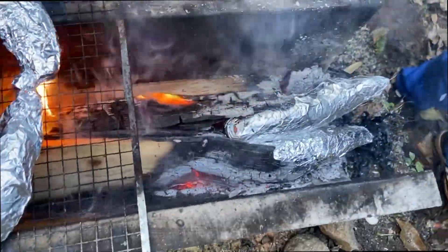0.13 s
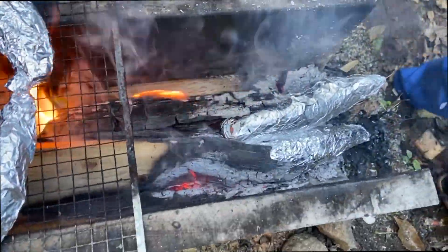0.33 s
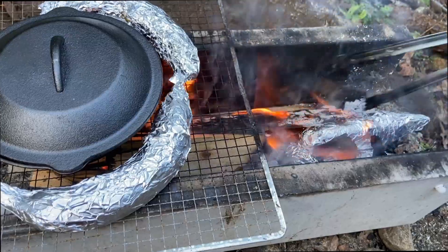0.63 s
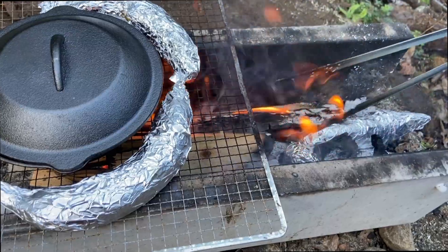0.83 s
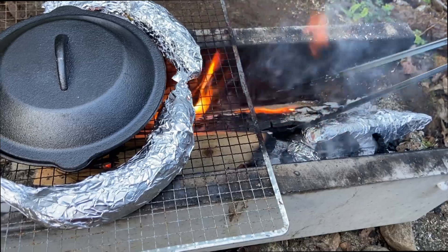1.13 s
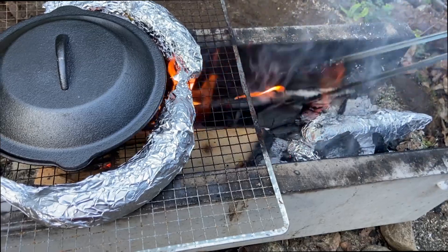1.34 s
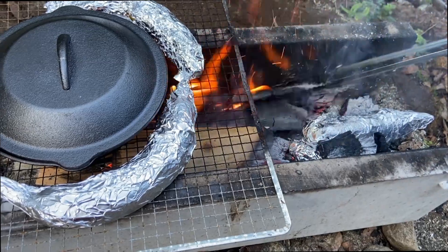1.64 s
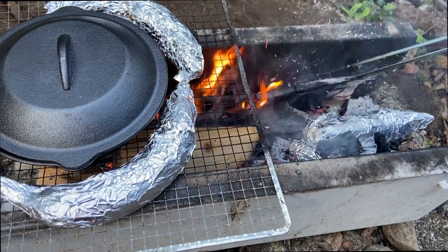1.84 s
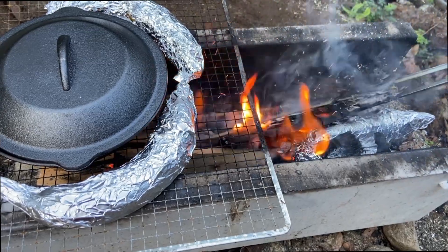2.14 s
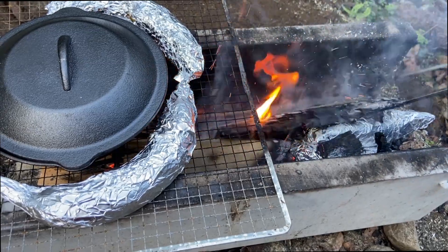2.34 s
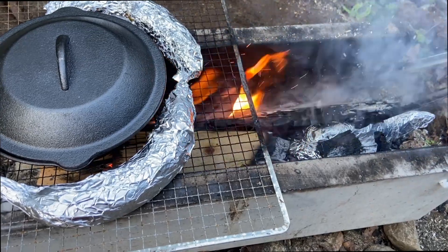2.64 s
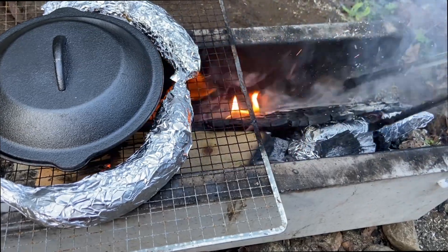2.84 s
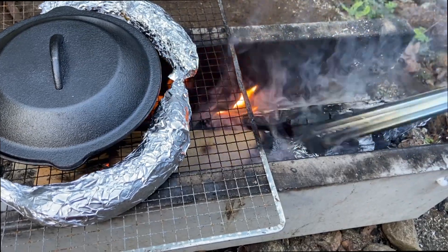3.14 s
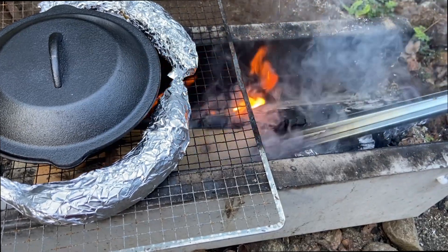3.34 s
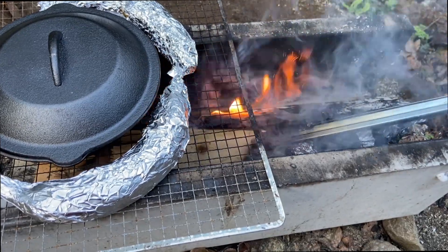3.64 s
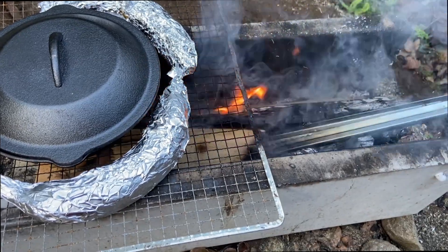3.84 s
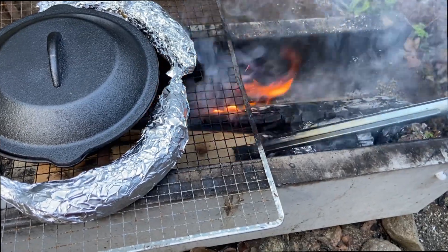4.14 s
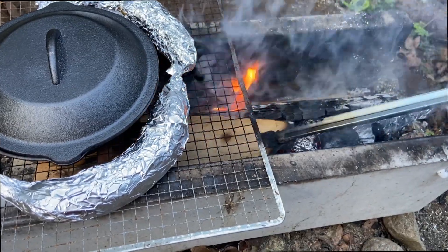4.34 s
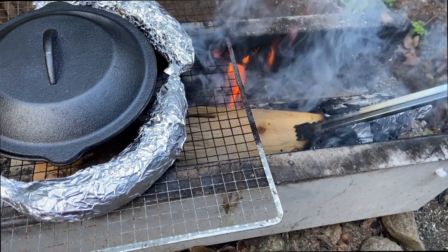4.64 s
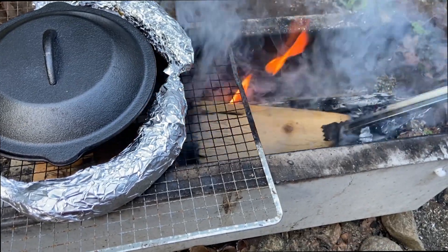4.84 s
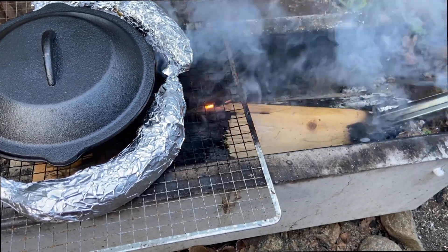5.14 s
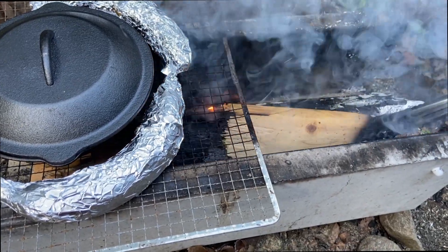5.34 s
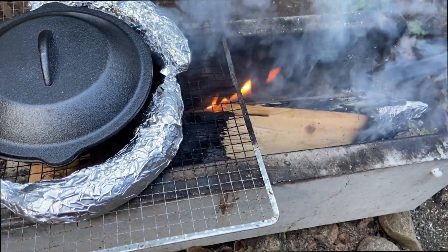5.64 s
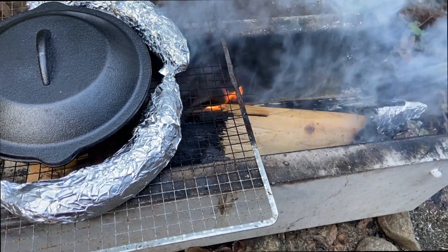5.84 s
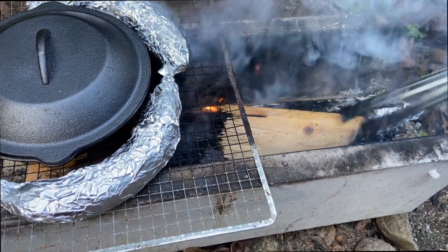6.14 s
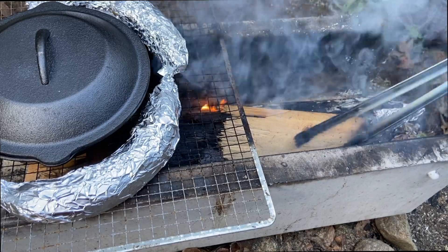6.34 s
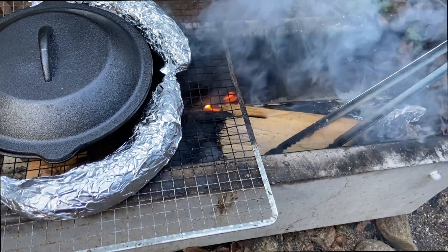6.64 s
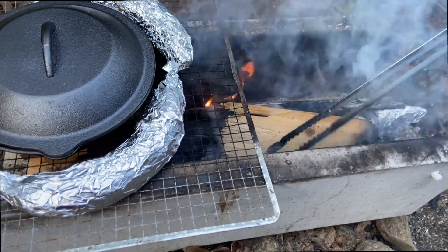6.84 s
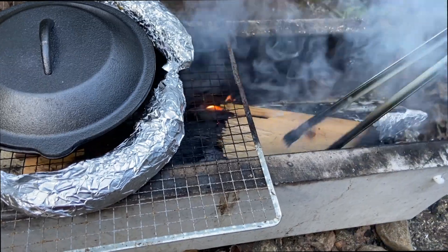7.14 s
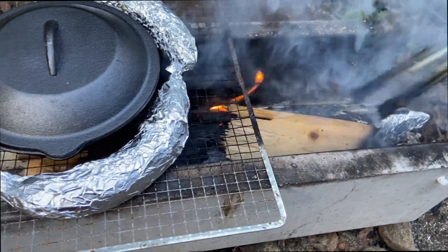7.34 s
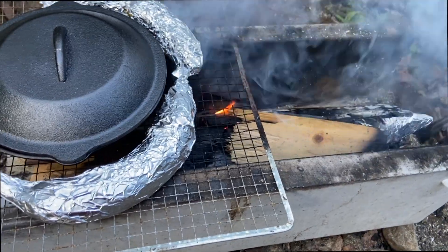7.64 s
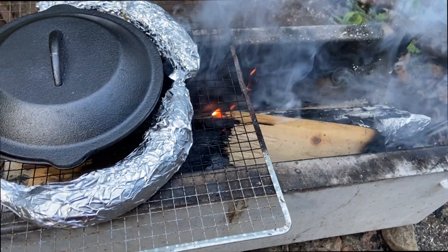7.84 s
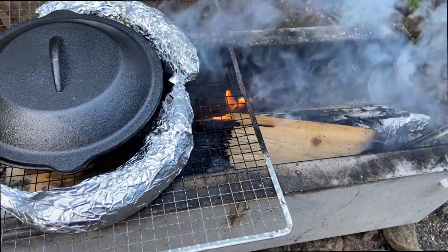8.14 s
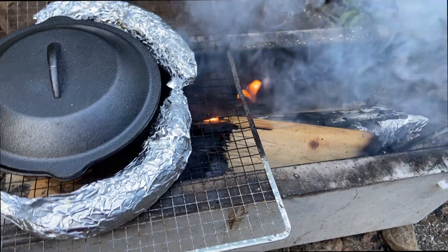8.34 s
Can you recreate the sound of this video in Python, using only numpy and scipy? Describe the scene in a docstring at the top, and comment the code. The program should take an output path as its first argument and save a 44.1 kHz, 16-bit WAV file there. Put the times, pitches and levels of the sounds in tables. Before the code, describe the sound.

Close crackling campfire outdoors, with charcoal scraping and knocking under clinking metal tongs and crickets chirping steadily behind.

```python
"""A fire pit and crickets

A wood fire burns in a steel pit in a yard, an arm's length away. Its flames flutter and flare,
and pockets of gas burst in the wood with a snap. Steel tongs rake the embers and drag a log
through them: charcoal grinds, squeaks and knocks, and the steel rings. Crickets chirp all round
by rubbing their wings, a few close by and the rest far off."""
import sys
import numpy as np
from scipy import signal
from scipy.fft import rfft, irfft
from scipy.io import wavfile
from scipy.ndimage import uniform_filter1d, map_coordinates

SR = 44100
rng = np.random.default_rng(int(sys.argv[2]) if len(sys.argv) > 2 else 0)


def dump_mix(stems):
    """Bounce the given channels to the path in sys.argv[1] as a 16-bit WAV at rate SR."""
    frames = np.atleast_2d(stems).T  # one column per channel
    limited = np.clip(frames, -1, 1)  # hard clip at full scale
    pcm = np.round(limited * 32767).astype(np.int16)
    wavfile.write(sys.argv[1], SR, pcm)


N = 374850
TIME = np.arange(N) / SR


def undb(db):
    """Turn decibels into a number to multiply a sound by."""
    return 10 ** (np.asarray(db) / 20)


def unit(x):
    """Scale a signal so that its average strength (rms) is 1."""
    return x / np.sqrt(np.mean(x ** 2))


def noise(size):
    """Two rows of noise: one for sound that arrives straight, one for sound blurred by the pit's walls."""
    return rng.standard_normal((2, size))


def straight(x):
    """Put a sound in the straight row and leave the blurred row silent."""
    return np.outer([1, 0], x)


def curve(points):
    """Join (time, value) points with straight lines."""
    return np.interp(TIME, *np.transpose(points))


def across(points):
    """Spread (frequency, value) points over every frequency in the sound."""
    hz, value = np.transpose(points)
    return np.interp(np.log(np.fft.rfftfreq(N, 1 / SR) + 1), np.log(hz), value)


def colour(x, spectrum):
    """Make some frequencies louder and others softer, then scale to strength 1."""
    return unit(irfft(rfft(x) * undb(across(spectrum)), N))


def resonate(x, hz, q):
    """Favour the frequencies near hz; a higher q rings longer."""
    hz = min(hz, SR * .42)
    return signal.lfilter(*signal.iirpeak(hz, max(q, hz / (SR * .4)), fs=SR), x)


def fade(t, t60):
    """Die away by 60 dB every t60 seconds (the fade time)."""
    return np.exp(-np.log(1000) * t / max(t60, 1e-4))


def wander(rate):
    """A random wobble of strength 1 that takes a new direction rate times a second."""
    hold = int(SR / rate)
    steps = np.repeat(rng.standard_normal(N // hold + 1), hold)
    return unit(uniform_filter1d(steps, hold)[:N])


def add(out, s, sound):
    """Mix a sound into out, starting at s seconds."""
    i = int(np.clip(s * SR, 0, N - 1))
    out[..., i:i + sound.shape[-1]] += sound[..., :N - i]


def swells(events, attack_s, t60):
    """A loudness curve in which each (start, length, level) event rises, holds and dies away."""
    power, t = np.zeros(N), TIME[:SR]
    for s, length, db in events:
        shape = np.minimum(t / attack_s, 1) * fade(np.maximum(t - length, 0), t60)
        add(power, s, (undb(db) * shape) ** 2)
    return np.sqrt(power)


def grains(rate, spread_db, t60):
    """Tiny random breaks, about rate a second, each a burst of noise: many weak, a few strong."""
    size = undb(spread_db * np.minimum(rng.exponential(size=N), 4))
    breaks = rng.random(N) < rate / SR
    energy = signal.lfilter([1], [1, -fade(1 / SR, t60) ** 2], breaks * size ** 2 + 1e-12)
    return np.sqrt(energy) * noise(N)


def echoes(pair, t60):
    """Many small reflections smear each row of a sound into a fading tail."""
    t = TIME[:SR // 2]
    tails = noise(len(t)) * fade(t, t60)
    return np.array([signal.fftconvolve(row, tail / np.linalg.norm(tail))[:N]
                     for row, tail in zip(pair, tails)])


# tone of the outdoor air: f/Hz, level/dB
AIR_SPECTRUM = [(20, -18), (45, 8), (100, 15), (250, 2), (500, 2.5), (1000, 1.5), (1800, -31), (2800, -38),
                (6000, 0), (10000, -7.5), (16000, -12)]

def air():
    """The open air of the yard is a faint, steady rumble and hiss."""
    return colour(noise(N), AIR_SPECTRUM) * undb(-66.5)


# how strongly the draught feeds the flames: t/s, level/dB
DRAUGHT = [(0, -55.5), (1.2, -60.5), (3.0, -59), (3.4, -57.5), (3.7, -53), (4.3, -67.5), (5.0, -55),
           (5.5, -67.5), (5.95, -65), (6.3, -60), (8.5, -62)]
# flames flaring up: t/s, length/s, level/dB
FLARES = [(0.76,0.049,-56), (0.92,0.065,-51.5), (1.42,0.23,-46.5), (1.83,0.086,-48), (2.06,0.059,-50),
          (2.3,0.049,-53.5), (2.43,0.11,-51.5), (4.04,0.022,-46), (4.15,0.05,-49), (4.92,0.094,-59),
          (6.02,0.058,-55.5), (7.47,0.038,-57), (7.97,0.13,-57.5)]
# tone of the low flames and of the flares: f/Hz, level/dB
FLAME_SPECTRUM = [(20, -40), (32, -47), (50, 1.5), (75, 3), (100, 4), (150, -8), (250, -11.5), (400, -11),
                  (700, -31), (2000, -36.5)]
FLARE_SPECTRUM = [(20, -42), (32, -40), (50, 0), (100, 1.5), (150, -5), (250, -10.5), (400, -11),
                  (700, -32), (2000, -32)]

def flames():
    """Swirling gas flutters on a slow draught; now and then it flares and burns more evenly."""
    flame_flutter_db, flare_flutter_db = 4.5, 2.5
    burning = colour(noise(N), FLAME_SPECTRUM) * undb(curve(DRAUGHT) + flame_flutter_db * wander(14))
    flaring = colour(noise(N), FLARE_SPECTRUM) * undb(flare_flutter_db * wander(20))
    return (burning + flaring * swells(FLARES, attack_s=.024, t60=.18)) * undb(-1)


def crumbs():
    """Small hard bits of charcoal click together, each ringing briefly at its own pitch."""
    per_second, low_hz, high_hz = 170, 548, 4495
    out, t = np.zeros(N), TIME[:SR // 25]
    for when, softness, pitch in rng.random((int(per_second * N / SR), 3)):
        hz = low_hz * (high_hz / low_hz) ** pitch
        db = -2.5 * np.log(softness + .043)
        add(out, when * N / SR, undb(db) * np.sin(2 * np.pi * hz * t) * fade(t, t60=.038))
    return straight(unit(out))


# strokes of the tongs and log through the embers: t/s, length/s, scrape level/dB, crackle level/dB
STROKES = [(0,0.37,-62.5,-70), (0.16,0.21,-67.5,-63), (0.637,0.6,-75.5,-84), (0.997,0.084,-68,-66),
           (1.071,0.15,-56,-53.5), (1.185,0.035,-43.5,-45.5), (1.272,0.13,-52,-47), (1.45,0.17,-61.5,-66),
           (1.581,0.07,-50.5,-47), (1.67,0.36,-62.5,-52.5), (1.995,0.13,-50,-47), (2.187,0.14,-54.5,-57),
           (2.36,0.076,-57.5,-58), (2.39,0.059,-50,-52), (2.706,0.049,-59.5,-58), (3.145,0.18,-62,-65),
           (3.289,0.073,-46,-47), (3.37,0.7,-61.5,-59.5), (3.608,0.032,-54,-50), (3.943,0.26,-55.5,-56),
           (4.146,0.068,-57,-51.5), (4.218,0.13,-53,-56.5), (4.408,0.29,-53,-60), (4.621,0.087,-49.5,-53),
           (4.743,0.27,-55.5,-58.5), (5.033,0.15,-61.5,-57.5), (5.199,0.11,-78,-53.5),
           (6.253,0.12,-66.5,-64.5), (6.415,0.15,-62,-61.5), (6.543,0.1,-55,-60.5), (6.721,0.17,-60,-64),
           (6.956,0.055,-62.5,-61), (7.083,0.11,-58,-70), (7.557,0.27,-74,-87), (7.789,0.066,-67.5,-63),
           (7.95,0.049,-55.5,-56), (8.189,.14,-61,-63), (8.426,0.063,-64.5,-64.5)]
# tone of the gritty scrape and of the fine crackle: f/Hz, level/dB
SCRAPE_SPECTRUM = [(120, 3.5), (300, -7.5), (420, 10.5), (600, -6.5), (900, 7.5), (1500, 1), (2200, 3),
                   (3500, 1.5), (5500, 2), (8000, 1.5), (16000, -6)]
CRACKLE_SPECTRUM = [(1500, -3.5), (3500, -5), (5500, 2.5), (8000, 2), (11000, 2), (14000, 2.5),
                    (16000, -13)]

def embers():
    """Raked charcoal grinds and crackles, and its hollow lumps ring; left alone, it ticks faintly."""
    bite_s, settle_s = .026, .24  # the tongs bite, then the coals trickle to rest
    scraping = swells(((s, length, db) for s, length, db, _ in STROKES), bite_s, settle_s)
    crackling = swells(((s, length, db) for s, length, _, db in STROKES), bite_s, settle_s)
    catching = undb(1.5 * wander(55))  # each stroke catches and slips at random
    grit = grains(rate=1500, spread_db=3.4, t60=.006)
    sparks = grains(rate=2600, spread_db=3.3, t60=.0035)
    ticks = grains(rate=90, spread_db=4, t60=.003)

    lumps = sum(resonate(grit, hz, q=10) * undb(4.5 * wander(28)) * (-1) ** k
                for k, hz in enumerate(np.geomspace(400, 4000, num=20)))
    grinding = colour(unit(grit) + undb(-1.5) * unit(lumps), SCRAPE_SPECTRUM)
    crumbling = unit(grinding + undb(-6) * crumbs())
    crunches = grains(rate=55, spread_db=2.6, t60=.02)  # bigger lumps give way one by one
    scrape = unit(crumbling + undb(-3) * colour(crunches, SCRAPE_SPECTRUM))
    splinters = grains(rate=90, spread_db=2.6, t60=.005)
    crackle = colour(unit(sparks) + undb(-3) * unit(splinters), CRACKLE_SPECTRUM)

    # hypot keeps a whisper of each going between strokes
    scrape *= np.hypot(scraping, undb(-96)) * undb(2.5)
    crackle *= np.hypot(crackling, undb(-86)) * undb(3)
    return (scrape + crackle) * catching + colour(ticks, CRACKLE_SPECTRUM) * undb(-78)


# charcoal and steel slipping: t/s, length/s, level/dB, f/Hz, wobble as a share of the pitch
SQUEAKS = [(0,0.38,-53.5,2444,0.053), (0,0.2,-56,2850,0.092), (3.756,0.22,-55,3000,0.061),
           (1.274,0.066,-46,880,0.058), (2.075,0.1,-45.5,616,0.034), (2.077,0.025,-33,1230,0.051),
           (4.162,0.098,-44.5,3160,0.043), (4.164,0.061,-41,3900,0.042), (4.314,0.07,-46,2690,0.08),
           (4.345,0.066,-45,2300,.07), (4.43,0.049,-41,2740,0.047), (4.545,0.047,-50,4750,.04),
           (4.77,0.076,-47,5220,0.04), (6.965,0.068,-58,1235,.03), (6.96,0.057,-53,2430,0.071),
           (7.159,0.075,-55,5760,.003)]

def squeaks():
    """Surfaces stick and slip, making short tones of shaky pitch and strength."""
    out = np.zeros(N)
    waver, grip = wander(500), undb(3 * wander(250) - 1.5)
    for s, length, db, hz, wobble in SQUEAKS:
        part = slice(int(s * SR), int((s + length) * SR))
        pitch_hz = hz * (1 + wobble * waver[part])
        tone = np.sin(2 * np.pi * np.cumsum(pitch_hz) / SR)
        add(out, s, undb(db) * np.hanning(len(tone)) * grip[part] * tone)
    return out


def cricket(first, last, period, length, db, pitch_hz, left_delay):
    """A chirp is a handful of wing strokes, each a tone that falls steeply as the wing slows."""
    wing_hz, pitch_fall, jitter_s = 66, .25, .006
    strokes = np.cumsum(wing_hz * (1 + .015 * wander(14))) / SR
    progress = strokes % 1  # runs from 0 to 1 in each stroke
    hz = pitch_hz * (1 + pitch_fall * (.5 - progress) + .012 * wander(10))
    strong_then_weak = 1 + .42 * np.cos(np.pi * (strokes - .5))
    pulses = np.sin(np.pi * progress) ** 2 * strong_then_weak * undb(wander(40))
    tone = np.sin(2 * np.pi * (np.cumsum(hz) / SR - np.outer([left_delay, 0], hz)))
    chirping, chirp = np.zeros(N), signal.windows.tukey(int(length * SR), .7)
    for s in np.arange(first, last + period / 2, period):
        add(chirping, s - length / 2 + jitter_s * rng.standard_normal(), chirp)
    return undb(db) * chirping * unit(pulses * tone)


# runs of nearby chirps: first t/s, last t/s, period/s, chirp length/s, level/dB, f/Hz, left delay/s
CHIRP_RUNS = [(0.11, 1.39, .256, .17, -54.5, 4350, .00049), (1.66, 5.37, .2645, .16, -53.5, 4340, .00049),
              (5.615, 8.48, .26, .15, -52.5, 4330, .00049), (0.492, 2.42, .274, .16, -53, 4010, .00049),
              (3.16, 3.46, .29, .15, -53, 4010, .00049), (5.52, 8.5, .271, .17, -56, 4070, .00049),
              (0.2, 8.5, .301, .28, -63, 4160, .00025)]
# tone of the far crickets: f/Hz, level/dB
CHORUS_SPECTRUM = [(2500, -28), (3300, -23.5), (3700, -7), (4000, 1.5), (4400, 4), (4800, -14), (5300, -16),
                   (5800, -33.5), (6800, -18.5), (7700, -104), (9000, -33), (12000, -68)]

def crickets():
    """Near crickets each keep their own pitch and beat; the far ones blend into one high buzz."""
    near = undb(1.14) * sum(cricket(*run) for run in CHIRP_RUNS)
    far = colour(noise(N), CHORUS_SPECTRUM) * undb(-52 + 2.04 * wander(30))
    chorus = near + undb(-9.5) * echoes(near, t60=.15) + far
    return chorus * undb([[.5], [-.5]])  # a little louder on the left


def unit_burst(x):
    """Scale each row so that its loudest millisecond has strength 1."""
    power = uniform_filter1d(x ** 2, SR // 1000)
    return x / np.sqrt(power.max(axis=1, keepdims=True))


# the wood snapping: t/s, level/dB, boost of the log's own sound/dB, middle of the crack f/Hz, fade/s
SNAPS = [(0.026,-28.5,-14.5,9100,0.0076), (0.223,-36,-22,11100,0.0087), (0.247,-18,-33,12500,0.0036),
         (0.342,-38,-22,11300,.008), (0.499,-49,-22,10100,.005), (0.535,-44,-10,8900,0.024),
         (0.737,-43.5,-11,10000,0.0039), (0.775,-41.5,-20,11500,.006), (0.9026,-24.5,-15,7160,0.0076),
         (0.961,-36,-18,9200,.01), (1.112,-44,-23,12000,.008), (1.174,-30.5,-4.5,6960,0.037),
         (1.2169,-23,-4.5,6800,0.039), (1.355,-23,-11,10500,0.089), (1.3948,-38,-19,9500,.009),
         (1.417,-36.5,4.5,6000,.008), (1.5863,-35,-7,10000,0.0076), (1.627,-32,2.5,6500,0.0075),
         (1.6398,-14,-5.5,9130,0.018), (1.6428,-25,4.5,7200,0.0056), (1.8804,-32,-9,10000,.006),
         (1.936,-26.5,-6.5,12600,0.0045), (1.959,-28,-11,7900,0.029), (2.033,-24.5,-12,9000,0.011),
         (2.1274,-37,-6,8700,.008), (2.249,-36,-3,9550,.007), (2.262,-34,-7,9000,0.0093),
         (2.5672,-48,7.5,7500,0.0053), (2.647,-20,-21,6840,0.015), (2.9342,-35.5,-15.5,11400,.008),
         (3.028,-34,-10,10300,0.02), (3.11,-47,-22,11500,.007), (3.153,-29,-13,11400,0.039),
         (3.216,-34.5,-22,7640,0.035), (3.296,-34,-9,10900,0.011), (3.3457,-29.5,-11,9770,0.011),
         (3.499,-36,-12,11300,0.0082), (3.516,-40,-13,9740,.006), (3.625,-30.5,-6,7360,0.017),
         (3.6618,-36,-6,9500,.007), (3.752,-31,-7,10400,0.012), (4.006,-33,-12,10000,0.0066),
         (4.095,-33,-5,10500,.011), (4.15,-30.5,-7,10600,0.0092), (4.2999,-25,-7.5,8400,0.009),
         (4.3067,-25.5,-1,7940,0.0094), (4.681,-34.5,4.5,5800,.012), (4.7054,-27,2,7360,0.014),
         (4.7332,-29.5,1,6500,0.015), (4.757,-36,-8,10000,.006), (4.9358,-36,-11,9500,0.0054),
         (5.088,-29.5,-17,9200,0.025), (5.27,-28,-5.5,8900,0.0061), (5.3054,-36,-8,11100,0.041),
         (5.641,-47,-30,10000,.006), (5.654,-40.5,-27,10000,0.006), (5.869,-45,-24,9000,0.0072),
         (5.9885,-27,-35,8700,0.0085), (6.0094,-27,-1,6300,0.0072), (6.0858,-34.5,-19,11200,0.0089),
         (6.1405,-45,-24,10000,.005), (6.181,-40,-20,9000,.008), (6.453,-48,-15,9970,.007),
         (6.5207,-41,-12,9000,.007), (6.578,-35,-11,8500,.008), (6.739,-45,-2,9500,.008),
         (7.285,-37,-16.5,10200,.007), (7.6556,-49,-22,10000,.005), (7.902,-48,-20,10000,.006),
         (7.9842,-40,0,7500,.01), (8.4044,-47,-24,9940,.006)]

def snaps():
    """A gas pocket bursts: fibres tear, a splinter pings and the log sounds under the crack."""
    out, t = np.zeros((2, N)), TIME[:SR // 20]
    cut_lows = signal.butter(4, 3900, "high", fs=SR, output="sos")  # thin fibres give off no lows
    for s, db, body_db, hz, t60 in SNAPS:
        tear = resonate(noise(len(t)) * fade(t, t60), hz, q=1)
        crack = unit_burst(signal.sosfilt(cut_lows, resonate(tear, hz, q=.82)))
        body = unit_burst(resonate(noise(len(t)) * fade(t, t60=.019), hz=1930, q=.42))
        ping = straight(np.sin(2 * np.pi * .87 * hz * t) * fade(t, t60=.044))
        add(out, s, undb(db) * (undb(-5.5) * crack + undb(body_db - 3.5) * body + undb(-20) * ping))
    return out


# the notes the tongs ring with: f/Hz, level/dB, fade/s
STEEL_NOTES = [(690,-14,0.19), (1240,-15.5,0.2), (1320,-17,0.12), (1820,-12.5,0.086), (3460,-17,.12),
               (5380,-13,.14), (5460,-5,0.12), (6080,-1.5,0.084), (6300,0,0.088), (8160,-9,0.17),
               (8721,-13,.17), (8900,-17,0.1), (9900,-14,0.17), (10700,-11,0.13), (11000,-13,.1),
               (11300,-16,0.15)]

def steel(grip):
    """Ringing steel, one row per note; a tighter grip raises the pitch, most of all for high notes."""
    t, full_rise_hz = TIME[:SR // 2], 5000
    notes = []
    for hz, db, t60 in STEEL_NOTES:
        gripped_hz = hz * (1 + grip * min(hz / full_rise_hz, 1))
        notes.append(undb(db) * np.sin(2 * np.pi * gripped_hz * t) * fade(t, t60))
    return np.array(notes)


# the tongs striking: t/s, level/dB, grip (the share by which the high notes rise)
CLINKS = [(0.3591, -42, 0), (1.356, -28.5, 0.002), (5.2684, -48, 0.008), (6.2333, -25, 0),
          (6.2375, -31.5, 0.016), (6.2707, -35, 0.0021), (7.003, -45, 0.031), (7.1, -55, .055),
          (7.1682, -40.5, .055), (7.214, -43, .055)]

def tong_clinks():
    """The steel arms clack and ring, a little differently at each spot where they hit."""
    out, t = np.zeros((2, N)), TIME[:SR // 2]
    for s, db, grip in CLINKS:
        note_gains = undb(1.5 * rng.standard_normal(len(STEEL_NOTES)))
        ring = straight(note_gains @ steel(grip))
        clack = resonate(noise(len(t)) * fade(t, t60=.027), hz=7800, q=1.6)
        add(out, s, undb(db - 11.5) * ring + undb(db - 2) * clack)
    return out


# soft bumps in the fire: t/s, level/dB, f/Hz
THUDS = [(0.563, -24, 89), (0.921, -29, 86), (1.437, -21.5, 108), (1.488, -26, 95), (1.519, -23, 70),
         (1.556, -23, 79), (1.59, -23, 100), (2.428, -30.5, 244), (3.812, -24.5, 93), (4.052, -34, 116),
         (4.152, -34, 70.0), (4.942, -33, 77), (5.866, -34.5, 109), (6.166, -28, 55.4), (7.095, -28.5, 274),
         (7.269, -31.5, 113), (7.714, -29.5, 104)]

def thuds():
    """Flame and shifting fuel make low bumps that swell and die within a few vibrations."""
    out, t, rise_s = np.zeros(N), TIME[:SR // 5], .0058
    bump = t / rise_s * np.exp(1 - t / rise_s)
    for s, db, hz in THUDS:
        add(out, s, undb(db - 15) * bump * np.sin(2 * np.pi * hz * t))
    return out


# logs and charcoal bumping together: t/s, level/dB, lowest note f/Hz, fade/s, boost of the crumbling/dB
KNOCKS = [(0.568,-35.5,303,0.051,-29), (0.961,-36,456,0.075,-8), (0.983,-42,834,0.12,4),
          (1.103,-51,630,.05,7), (1.174,-44,776,0.042,5), (1.199,-36,1220,0.046,3),
          (1.273,-36,428,0.085,-6), (1.408,-32,400,0.056,-12), (1.464,-37.5,383,0.054,4),
          (1.487,-42.5,420,.12,-19), (1.566,-41,393,.14,-10), (1.640,-28,397,0.068,-10),
          (1.671,-39,304,.05,-12), (1.963,-41,458,0.063,2.5), (2.016,-36,895,0.11,-14),
          (2.046,-40,655,0.05,5), (2.089,-36,605,0.085,-18), (2.261,-40,830,0.049,-16),
          (2.362,-43.5,636,0.025,1), (2.403,-41,716,0.13,-6), (2.483,-40,710,0.037,-8),
          (2.7211,-26.5,478,0.043,-7), (2.7218,-25,805,0.045,-24), (3.031,-43,370,0.048,-12),
          (3.063,-42.5,557,0.024,-7), (3.154,-28.5,870,0.043,-2.5), (3.182,-38,526,.035,-10),
          (3.215,-37.5,443,0.053,-1.5), (3.297,-36,495,0.1,-19), (3.345,-35.5,736,0.049,-6),
          (3.6253,-33,727,0.045,-22), (3.777,-40,720,0.021,9.5), (3.841,-65,610,0.03,9),
          (4.006,-37,515,0.032,-17), (4.304,-43.5,1067,0.13,6), (4.7075,-42,940,0.021,13),
          (4.952,-44.5,488,0.18,4.5), (5.077,-42,438,0.11,2), (5.166,-51,596,0.034,-4),
          (6.01,-42.5,450,0.052,4), (6.569,-43.5,420,.04,0), (6.661,-40,1230,0.044,-4),
          (6.851,-40.5,290,0.1,0), (6.853,-38.5,792,0.083,-8), (7.1,-46,567,0.031,-11),
          (7.956,-39,427,0.072,-4), (7.986,-40.5,328,0.055,-6), (7.999,-36.5,420,0.056,1.5),
          (8.007,-38,650,0.043,-12), (8.255,-53,630,0.059,4)]
# the notes of a charred lump: multiple of its lowest note, level/dB
WOOD_NOTES = [(1.002, -0.5), (1.45, -6), (1.95, -9.5), (2.9, -16)]

def knocks():
    """Charred wood rings only briefly when it is hit, and crumbs break off at the spot."""
    out, t = np.zeros((2, N)), TIME[:SR // 4]
    for s, db, hz, t60, crumble_db in KNOCKS:
        detunes = 1 + .07 * rng.standard_normal(len(WOOD_NOTES))
        ring = sum(undb(note_db) * np.sin(2 * np.pi * hz * ratio * detune * t)
                   for (ratio, note_db), detune in zip(WOOD_NOTES, detunes))
        crumbling = unit(resonate(noise(len(t)), hz=850, q=.3))
        knock = undb(-5) * straight(ring) + undb(crumble_db - 6.5) * crumbling
        add(out, s, undb(db) * knock * fade(t, t60))
    return out


# how loudly the log drags: t/s, level/dB
LOG_DRAG = [(3.7,-87), (3.82,-70), (4.15,-57.5), (4.35,-48), (4.42,-55), (4.62,-49.5), (4.9,-53),
            (4.98,-52.5), (5.06,-74), (5.35,-92)]
# the notes the log rings with: f/Hz, level/dB
LOG_NOTES = [(431,-7), (646,-5), (880,-20), (1360,3), (1800,1), (2340,3.5), (2750,1), (3400,4.5), (4800,-3),
             (5180,5.5)]

def dragged_log():
    """The log sticks and slips over the coals; as it shifts, now one note rings out and now another."""
    slips = grains(rate=450, spread_db=3.8, t60=.002)
    ring = sum(undb(db + 3 * wander(25)) * unit(resonate(slips, hz, q=15)) for hz, db in LOG_NOTES)
    position = np.cumsum(1 + .03 * wander(9))  # the pitch drifts as the log's support moves
    drifting = np.array([map_coordinates(row, [position], mode="mirror") for row in ring])
    return unit(drifting) * undb(curve(LOG_DRAG) + .5)


# the tongs sliding along the log: t/s, length/s, level/dB, grip (the share by which the high notes rise)
SLIDES = [(6.283, 0.32, -85.5, 0), (6.58, 0.54, -93, .025), (7.087, 0.11, -78.5, .055)]

def tong_slides():
    """Many tiny slips along the log make the steel sing faintly."""
    out = np.zeros(N)
    slips = unit(grains(rate=270, spread_db=6.5, t60=.00074)[0])
    for s, length, db, grip in SLIDES:
        rubbing = swells([(s, length, db)], attack_s=.071, t60=.086) * slips
        out += signal.fftconvolve(rubbing, steel(grip).sum(axis=0))[:N]
    return straight(out)


# how far the left microphone's wave runs ahead of the right's: f/Hz, phase/rad
LEFT_LEAD = [(60, 0), (250, -.15), (500, -.8), (1000, -2.3), (1400, -3.3), (1800, -5.2), (2400, -4.4),
             (4200, -6.1), (5500, -5.3), (7100, -3.2), (7900, -3.05), (9700, -.1), (11000, .1),
             (13000, 3.05), (14300, 3.3), (15800, 6.1)]
# how much louder the left is than the right: f/Hz, level/dB
LEFT_BALANCE = [(200, 0), (700, 1), (1350, -11.5), (2000, -1.5), (3500, -1), (5000, 0)]
# how alike the two sides are: f/Hz, likeness from 0 to 1
LIKENESS = [(80, 1), (300, 0.7), (900, 0.7), (1500, 0.03), (3000, 0.75), (5000, 1), (7400, 1), (8800, 0.9),
            (10300, 0.86), (12000, 0.72), (13600, 1), (15500, 0.23)]

def microphones(pair):
    """Left and right each hear the straight and the blurred sound with their own timing and level."""
    likeness = np.clip(across(LIKENESS), 0, 1)
    direct, blurred = rfft(pair) * np.sqrt([(1 + likeness) / 2, (1 - likeness) / 2])
    balance = undb(across(LEFT_BALANCE))
    left = (direct + blurred) * balance * np.exp(1j * across(LEFT_LEAD))
    right = direct - blurred
    return irfft(np.array([left, right]) * np.sqrt(2 / (1 + balance ** 2)), N)


def scene():
    """Fire and tongs close by, a faint echo from the yard, crickets and outdoor air behind."""
    fire = snaps() + knocks() + tong_clinks() + tong_slides() + embers() + dragged_log()
    tones = straight(squeaks() + thuds())
    yard_echo = echoes(fire, t60=.06) * undb(-17)
    return microphones(fire + tones + air() + flames()) + yard_echo + crickets()


def record(dry):
    """Cut away the very highest treble."""
    top_hz = 16100
    return signal.sosfilt(signal.ellip(10, .2, 80, top_hz, fs=SR, output="sos"), dry)


dry = scene()
out = record(dry)
dump_mix(out)
```